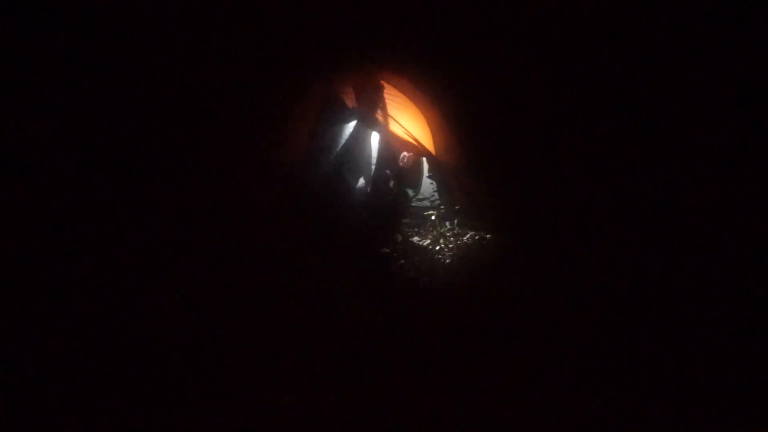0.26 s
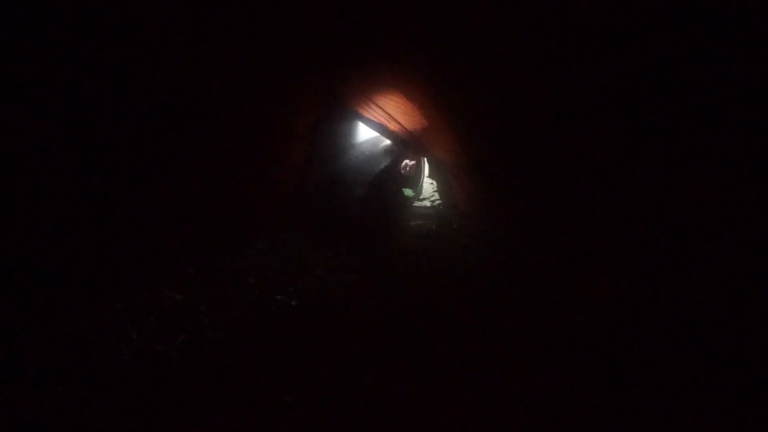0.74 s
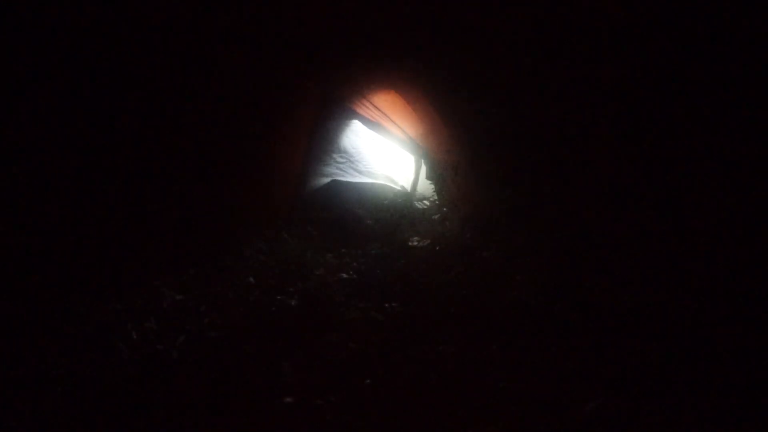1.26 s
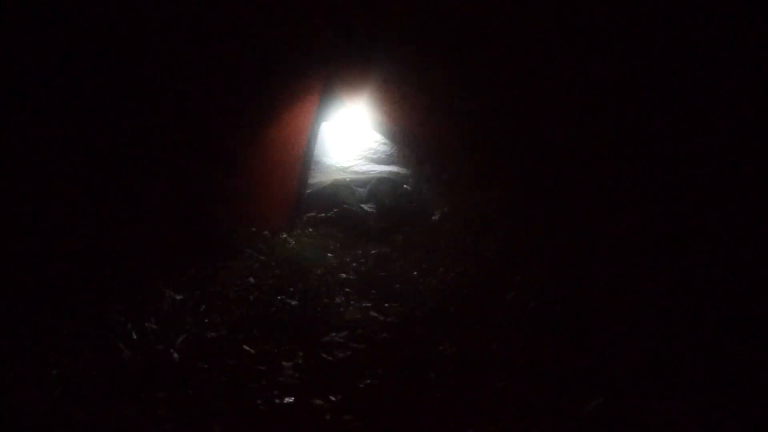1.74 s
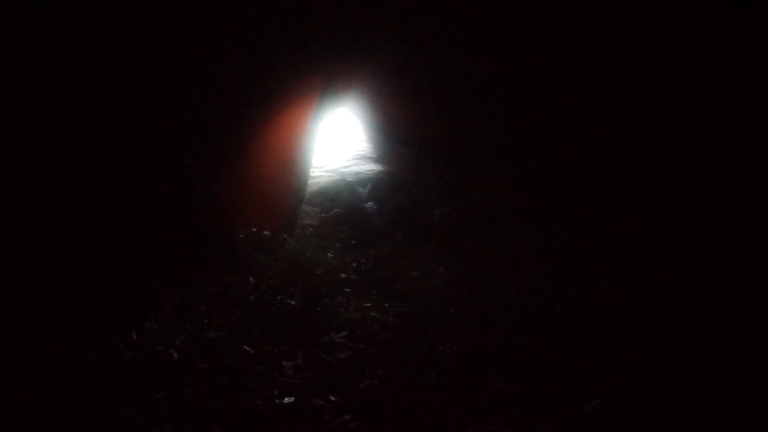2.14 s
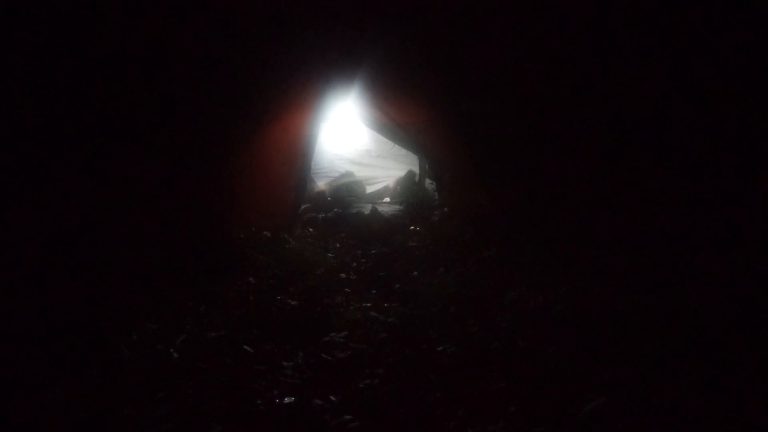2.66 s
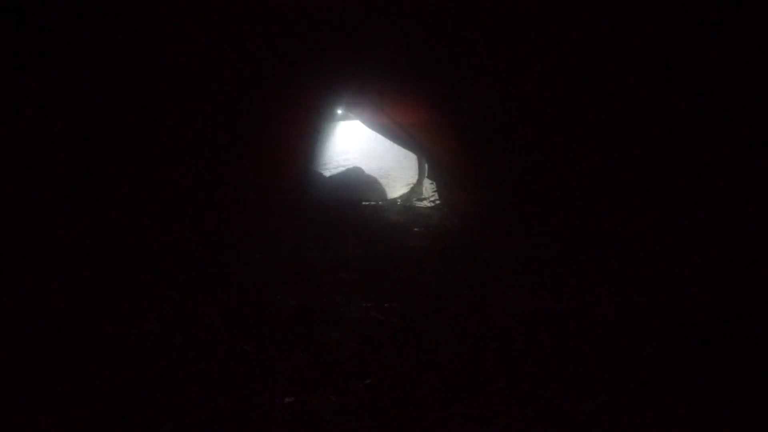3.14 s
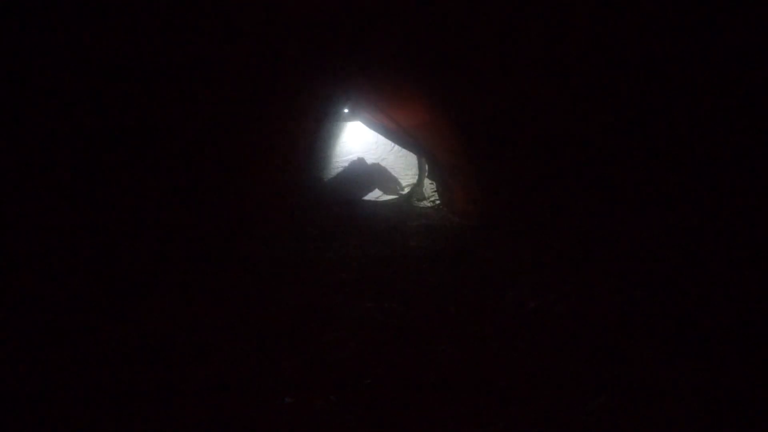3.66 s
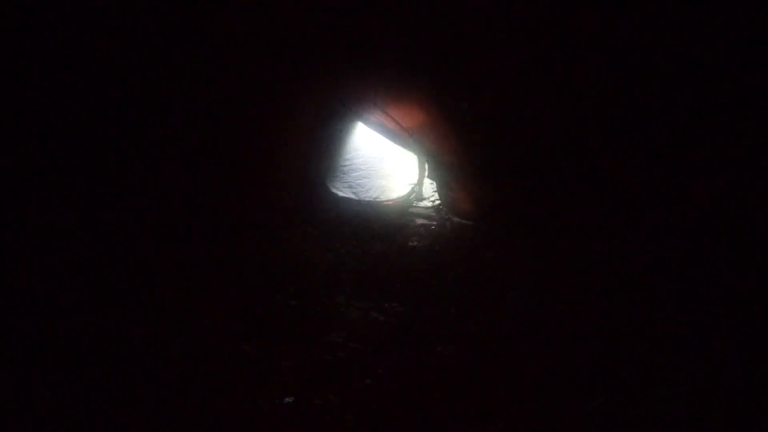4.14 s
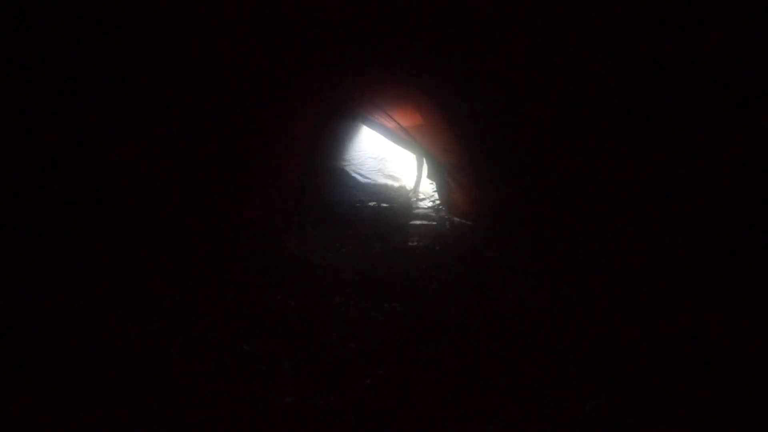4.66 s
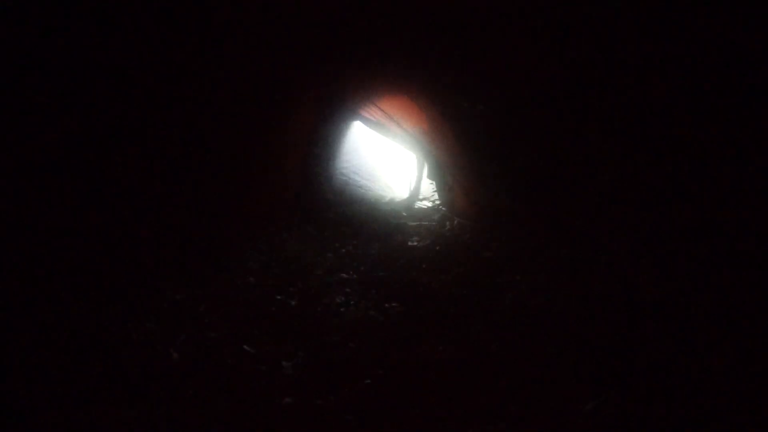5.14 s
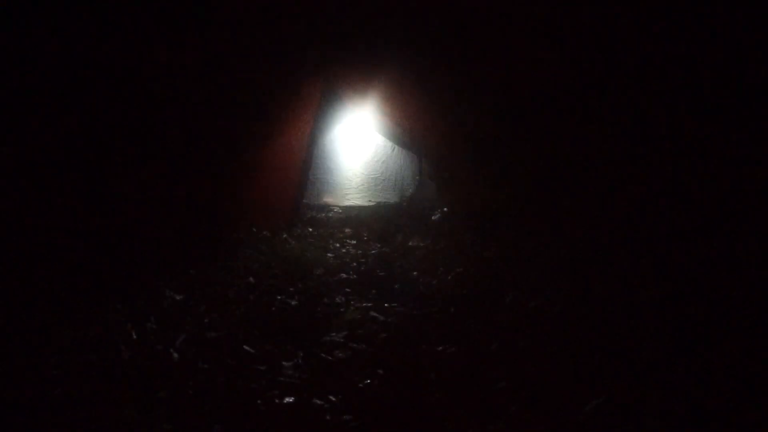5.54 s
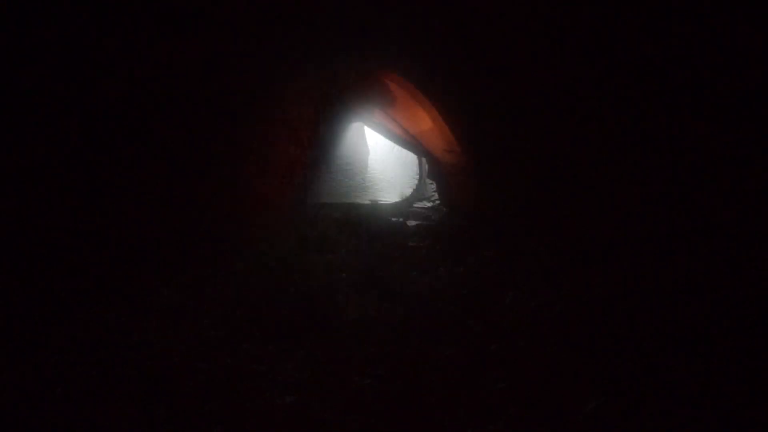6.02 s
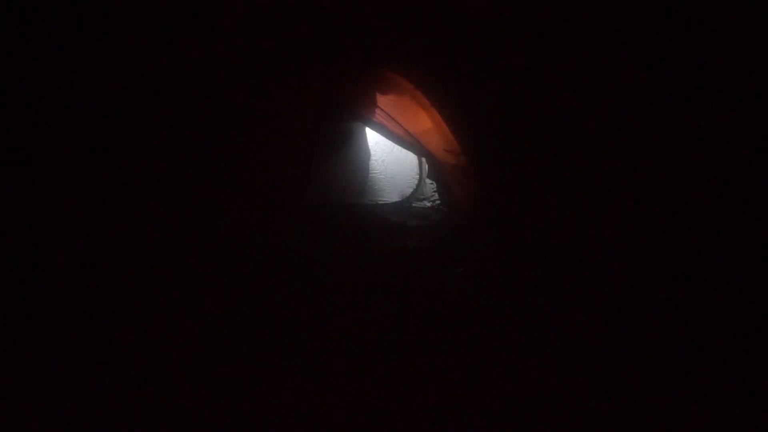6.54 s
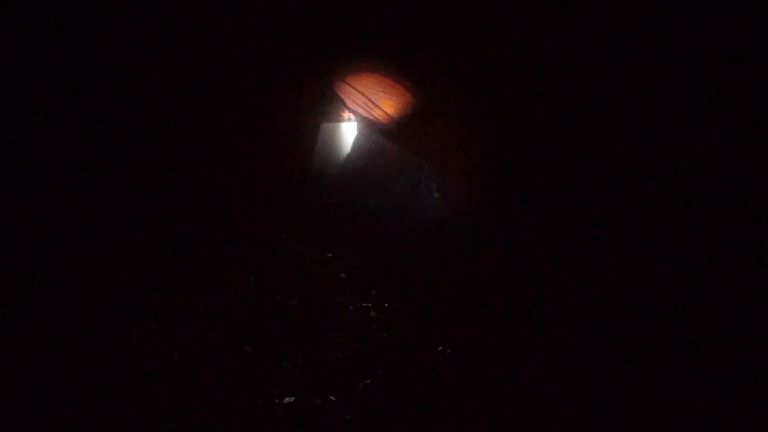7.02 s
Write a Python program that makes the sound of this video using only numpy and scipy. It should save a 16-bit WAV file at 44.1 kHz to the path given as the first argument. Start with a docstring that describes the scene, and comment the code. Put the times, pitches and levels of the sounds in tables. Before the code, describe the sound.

A quiet campsite at night, faint steady hush with a barely audible high whine, tent some metres away and slightly left. Soft nylon swishes open. At 0.6 s a zipper accelerates into a bright singing buzz, snaps near 1.0, and slows to a low uneven rasp until 1.3. Cloth slides gently, with a small snap at 1.75. A short zip rises and falls at 2.45-2.65, breathy on top; a low brief pull with quick knocks follows at 2.8-2.9. Airy nylon swishes swell around 3.1 and 3.4, with a sharp tap at 3.4 and little ticks at 3.8-4.0. After a lull, bright sweeping cloth whistles at 4.7-5.0. The final run starts as a slow growl at 5.1, then becomes a fast, higher buzz from 5.35 to 5.75, with a strong knock and snap near 5.7. Fading rustles and light taps come at 6.2 and 6.7, then hush.

```python
"""Tent zipper at night

A tent door some metres away at a quiet campsite is zipped in four short runs of one or two pulls.
The slider ticks over the teeth, and the taut panel sings at the tooth rate (sine waves) over a noisy rasp.
Shaped noise makes nylon swish and rustle, uneven sines whistle breathily, and short bursts knock.
Under it lie a faint outdoor hush of steady noise and a thin electronic whine."""
import sys
import numpy as np
from scipy import signal
from scipy.fft import rfft, irfft, next_fast_len
from scipy.io import wavfile
from scipy.ndimage import map_coordinates

SR = 44100
rng = np.random.default_rng(int(sys.argv[2]) if len(sys.argv) > 2 else 0)


def master_out(mix):
    """Clip the mix to full scale and print it as 16-bit PCM to the path in sys.argv[1]."""
    frames = np.transpose(np.atleast_2d(mix))
    ceiling = np.clip(frames, -1, 1)
    pcm = np.round(ceiling * 32767).astype(np.int16)
    wavfile.write(sys.argv[1], SR, pcm)


N = 321351
TOP_HZ = 15800  # nothing is kept above this


def amp(db):
    """Decibels to gain."""
    return 10 ** (np.asarray(db) / 20)


def unit(x):
    """Scale a signal to rms 1."""
    return x / np.sqrt(np.mean(x ** 2) + 1e-20)


def along(points, hz):
    """Read (frequency, value) points at any frequency, on a log axis."""
    f, v = np.transpose(points)
    return np.interp(np.log(hz + 1), np.log(f + 1), v)


def curve(rows, axis):
    """One column of a table, joined by straight lines in time."""
    columns = np.transpose(rows)
    return np.interp(np.arange(N) / SR, columns[0], columns[axis])


def wobble(rate):
    """A smooth random curve through `rate` random points a second."""
    points = rng.standard_normal(int(N * rate / SR) + 4)
    return map_coordinates(points, [np.arange(N) * rate / SR])


def filtered(x, response):
    """Multiply the spectrum of x by a response that depends on frequency."""
    m = next_fast_len(N + SR // 4)
    hz = np.fft.rfftfreq(m, 1 / SR)
    return irfft(rfft(x, m) * response(hz), m)[..., :N]


def coloured(pair, spectrum, alike):
    """Turn two unrelated signals into stereo of rms 1 with a given colour and left-right likeness."""
    def mid_side(hz):
        turn = np.arccos(np.clip(along(alike, hz), -1, 1)) / 2
        return amp(along(spectrum, hz)) * [np.cos(turn), np.sin(turn)]

    mid, side = filtered(pair, mid_side)
    return unit(np.array([mid + side, mid - side]))


def during(rows):
    """Gain 1 over the time span of a table, fading in and out just outside it."""
    fade_s = 0.014
    t = np.arange(N) / SR
    inside_s = np.minimum(t - rows[0][0], rows[-1][0] - t)
    return np.clip(1 + inside_s / fade_s, 0, 1)


def swell(peak_s, rise_s, fall_s):
    """One swell of sound: the gain grows to 1 at its peak and sinks again."""
    loss_db, roundness = 10, 1.32  # dB lost after one rise or fall time; shape of the top
    gain = np.zeros(N)
    start = max(0, int((peak_s - 4 * rise_s) * SR))
    stop = min(N, int((peak_s + 4 * fall_s) * SR))
    near = np.arange(start, stop)
    t = near / SR - peak_s
    gain[near] = amp(-loss_db * np.maximum(-t / rise_s, t / fall_s) ** roundness)
    return gain


def movements(rows, axis):
    """Overlapping movements add up in power; one column holds their peak levels."""
    return np.sqrt(sum((amp(row[axis]) * swell(*row[:3])) ** 2 for row in rows))


# Colour of the night hush: (frequency [Hz], relative level per Hz [dB])
HUSH_COLOUR = [(15, -63), (25, -37), (187, -18.5), (258, -11.5), (329, -10.5), (387, -5.5), (717, -5),
               (1130, -9), (2270, -7.5), (3400, -12), (7610, -16), (9440, -16), (10800, -15.5),
               (14100, -17), (15300, -8.5)]
# How alike left and right are in the hush: (frequency [Hz], coherence [-1 to 1])
HUSH_LIKENESS = [(60, 0.015), (150, 0.25), (380, -0.24), (950, -0.3), (2380, -0.2), (5980, 0.15),
                 (15000, 0.39)]


def night():
    """Steady wide noise, plus a band of noise near 1.2 kHz that sounds soft and hollow."""
    hush = coloured(rng.standard_normal((2, N)), HUSH_COLOUR, HUSH_LIKENESS)
    hush_gain = amp(-55 + 0.3 * wobble(11))
    hollow_colour = [(600, -42), (950, -9.5), (1150, -8.0), (1350, -7.5), (1700, -53)]
    hollow = coloured(rng.standard_normal((2, N)), hollow_colour, HUSH_LIKENESS)
    return hush_gain * hush + amp(-62.0) * hollow


# How long ground and trees scatter sound: (frequency [Hz], time to fall by 60 dB [s])
SCATTER_TIMES = [(200, 0.22), (1200, 0.71), (4000, 0.3), (14000, 0.096)]


def clearing(x):
    """Ground and trees scatter a thin, short answer: dying noise, different in each ear."""
    hz, t, z = signal.stft(rng.standard_normal((2, SR // 3)), SR, nperseg=256)
    decay = amp(-60 * t / along(SCATTER_TIMES, hz)[:, None])
    tail = signal.istft(z * decay, SR, nperseg=256)[1]
    tail = tail / np.linalg.norm(tail[0])
    return signal.fftconvolve(x.mean(0)[None], tail, axes=1)[:, :N]


# How alike left and right are in tent sounds: (frequency [Hz], coherence [-1 to 1])
TENT_LIKENESS = [(200, 0.9), (1100, 0.36), (2400, 0.43), (5000, 0.72), (12000, 0.86)]


def rubbing(spectrum, grain_db, flutter_db):
    """Cloth friction is many tiny slips in clumps: noise with a random level, fast and slow."""
    level_db = grain_db * wobble(1400) + flutter_db * wobble(60)
    slips = rng.standard_normal((2, N)) * amp(level_db)
    return coloured(slips, spectrum, TENT_LIKENESS)


# Nylon sliding on nylon:
# (peak time [s], rise time [s], fall time [s], swish level [dB], sheen level [dB])
NYLON_SLIDES = [(0.02, .1, .1, -62.5, -61), (0.156, 0.19, 0.18, -57.5, -58.5),
                (0.335, 0.16, 0.12, -54, -52.5), (0.55, .2, 0.22, -60.5, -63.5),
                (1.34, 0.16, 0.48, -58, -57.5), (1.67, 0.068, 0.21, -59.5, -58.5),
                (1.9, 0.18, 0.11, -56, -56.5), (2.05, 0.099, .15, -62.5, -60),
                (2.67, 0.081, .15, -60, -58.5), (2.92, 0.15, 0.24, -53, -59),
                (3.09, 0.19, 0.23, -50.5, -45), (3.4, 0.11, 0.24, -53, -50),
                (3.72, 0.17, 0.4, -61.5, -62.5), (3.96, 0.073, 0.1, -57, -63.5),
                (4.6, 0.085, 0.086, -60.5, -63), (4.71, 0.034, .08, -53, -51.5),
                (4.785, 0.068, 0.17, -52, -44.5), (4.93, .09, 0.11, -55.5, -45),
                (5.0, .06, 0.067, -49.5, -46), (5.11, 0.073, 0.12, -59.5, -56), (5.79, .05, 0.15, -58, -58),
                (6.27, .025, 0.096, -59, -62), (6.345, .06, 0.27, -59.5, -58), (6.67, 0.022, .05, -61, -58),
                (6.715, 0.053, 0.12, -57.5, -53.5)]
# The floor and bedding shifting: (peak time [s], rise time [s], fall time [s], rustle level [dB])
FLOOR_SHIFTS = [(2.56, 0.0093, 0.044, -49), (2.835, 0.067, 0.033, -48.5), (2.885, 0.021, 0.044, -51),
                (3.08, 0.36, .13, -60.5), (3.385, .03, 0.16, -59), (3.8, 0.32, 0.2, -62),
                (4.74, 0.078, 0.071, -60.5), (5.35, .015, .015, -47.5), (5.475, .025, .05, -59),
                (6.185, .01, 0.061, -57), (6.28, .04, .05, -55), (6.41, 0.17, 0.15, -59),
                (6.665, 0.033, .1, -64)]
# Colour of the swish: (frequency [Hz], relative level per Hz [dB])
SWISH_COLOUR = [(300, -17), (700, -6.5), (1150, 2), (1650, -4.5), (2300, 1), (3200, -4.5), (5000, -0.5),
                (6300, -9), (9000, -22)]
# Colour of the sheen, the bright top of the swish: (frequency [Hz], relative level per Hz [dB])
SHEEN_COLOUR = [(3000, -46), (5500, -6), (7300, -1.5), (10000, -1), (12800, 0), (15500, -5)]
# Colour of the low rustle: (frequency [Hz], relative level per Hz [dB])
RUSTLE_COLOUR = [(40, -19), (110, -19), (200, -4.5), (350, 3), (600, 1.5), (1000, -7), (2000, -24.5)]


def nylon():
    """The door slides over itself while floor and bedding shift: swells of friction noise."""
    swish = movements(NYLON_SLIDES, axis=3) * rubbing(SWISH_COLOUR, grain_db=2.0, flutter_db=1.47)
    sheen = movements(NYLON_SLIDES, axis=4) * rubbing(SHEEN_COLOUR, grain_db=1.0, flutter_db=1.2)
    rustle = movements(FLOOR_SHIFTS, axis=3) * rubbing(RUSTLE_COLOUR, grain_db=1.0, flutter_db=3.5)
    return swish + sheen + rustle


# Short breathy whistles: some are brush-like strokes, those at 2.55, 2.57 and 5.435 s are
# bright upper tones of the zip: (peak time [s], rise time [s], fall time [s], level [dB],
# pitch at the peak [Hz], glide [Hz per s], unevenness [share of the pitch])
SHORT_WHISTLES = [(2.55, .015, .02, -43, 2153, 0, .08), (2.57, 0.066, .04, -46, 2348, -1500, .19),
                  (3.09, 0.07, .12, -50, 4960, -3000, .12), (3.41, .05, .05, -55.5, 2080, 0.5, .08),
                  (4.72, 0.022, .04, -56, 2800, 0, .11), (4.995, 0.044, .025, -49.5, 2365, 2001, .08),
                  (4.99, .05, 0.031, -49, 4890, 0, .1), (5.435, 0.019, 0.064, -48.5, 5300, -11000, 0.098),
                  (6.303, .017, .017, -51.5, 2140, 5998, 0.1)]
# One long sweep of the door across the weave: (time [s], thread rate [Hz], level [dB])
DOOR_SWEEP = [(4.75, 4170, -56), (4.79, 8500, -48), (4.82, 9500, -48.5), (4.86, 7500, -55),
              (4.92, 8050, -50), (4.995, 6430, -50), (5.04, 12500, -54), (5.07, 12000, -55)]


def whistles():
    """Breathy whistles, a long sweep and short swells: sines with an uneven pitch and level."""
    t, waver = np.arange(N) / SR, wobble(1600)
    flicker = unit(amp(2.6 * wobble(900)))

    def whistle(hz, uneven):
        cycles = np.cumsum(hz * (1 + uneven * waver)) / SR
        return np.sqrt(2) * np.sin(2 * np.pi * cycles)

    sweep_gain = during(DOOR_SWEEP) * amp(curve(DOOR_SWEEP, axis=2))
    total = sweep_gain * whistle(curve(DOOR_SWEEP, axis=1), uneven=0.0755)
    for s, rise, fall, db, hz, glide, uneven in SHORT_WHISTLES:
        total += amp(db) * swell(s, rise, fall) * whistle(hz + glide * (t - s), uneven)
    return flicker * total


# Knocks of the pull tab and tent gear, levels before small trims:
# (time [s], ring level [dB], ring pitch [Hz], low thud level [dB])
GEAR_KNOCKS = [(2.827, -39, 450, -53), (2.863, -43, 450, -52), (2.8773, -34, 448, -50),
               (3.382, -31.5, 2205, -53), (3.792, -41.5, 910, -61), (3.913, -46.5, 2380, -54),
               (3.94, -55, 2000, -58), (3.98, -48, 2197, -55), (5.685, -27, 474.5, -60),
               (6.178, -35, 1230, -49), (6.666, -45.5, 3070, -62)]
# Sharp snaps of the slider and cloth: (time [s], level before a 5.5 dB cut [dB])
CLOTH_SNAPS = [(1.0144, -38), (1.7522, -42), (2.938, -34.5), (5.6828, -25.5)]
# What a knock rings with: (multiple of its ring pitch, level [dB], time to fall by 60 dB [s])
RING_MODES = [(.7, -15.5, .018), (1, 2, 0.0097), (1.35, -3, 0.012), (2.3, -7.5, .008)]


def taps():
    """Knocks are dying sines with a crack and a thud of noise; snaps are a bright crack only."""
    out, t = np.zeros(N + SR), np.arange(SR // 8) / SR

    def burst(lo_hz, hi_hz):
        band = signal.butter(2, [lo_hz, min(hi_hz, TOP_HZ)], "band", fs=SR, output="sos")
        return unit(signal.sosfilt(band, rng.standard_normal(len(t))))

    for s, db, hz, thud_db in GEAR_KNOCKS:
        ring = np.zeros(len(t))
        for ratio, mode_db, t60 in RING_MODES:
            chance_db = rng.normal(0, 0.88)
            ring += amp(mode_db + chance_db - 60 * t / t60) * np.sin(2 * np.pi * hz * ratio * t)
        ring *= 1 - np.exp(-1.3 * hz * t)  # the cloth takes about a cycle to give
        crack = 0.5 * amp(-60 * t / 0.0077) * burst(hz * 0.66, hz * 3)
        thud = amp(thud_db + 1.5 - 60 * t / 0.05) * burst(lo_hz=209, hi_hz=680)
        out[round(s * SR):][:len(t)] += amp(db + 1.0) * (ring + crack) + thud
    for s, db in CLOTH_SNAPS:
        snap = amp(db - 5.5 - 60 * t / 0.016) * burst(lo_hz=4950, hi_hz=15140)
        out[round(s * SR):][:len(t)] += snap
    return out[:N]


# Each pull of the slider: (lift of the second partial [dB], loudest rasp level [dB], its course),
# the course in rows of (time [s], teeth per second [Hz], panel tone level [dB], sizzle level [dB])
ZIPPER_PULLS = [ (-7.5, -46.5, [(0.595, 380, -63, -66), (0.623, 430, -61, -63), (0.635, 759.8, -48, -62),
                (0.651, 784.2, -41.5, -61), (0.672, 809, -57.5, -58.5), (0.75, 1172, -46, -49.5),
                (0.818, 1183, -45, -49.5), (0.831, 1140, -35, -49), (0.895, 1112, -34.5, -49.5),
                (0.965, 1160, -40.5, -44), (1.012, 1167, -37, -36), (1.04, 949, -47, -45),
                (1.063, 481, -52, -46)]), (-11, -46.5, [(1.078, 230, -50, -41.5), (1.105, 250, -51.5, -50),
                (1.138, 480, -40.5, -47), (1.178, 290, -49.5, -52), (1.24, 285, -48, -57.5),
                (1.28, 330, -40.5, -54.5), (1.32, 175.6, -48.5, -62), (1.332, 150.2, -70, -68)]),
                (-3.5, -46.5, [(2.435, 260.5, -59.5, -81), (2.46, 459.3, -47, -63),
                (2.5, 719.5, -46.5, -51), (2.53, 811, -43, -53), (2.555, 700.4, -63, -43.5),
                (2.582, 900, -54, -44), (2.612, 428, -46.5, -54.5), (2.63, 379, -62, -61),
                (2.66, 331, -63, -66)]), (-4, -65, [(2.775, 279.6, -65, -63), (2.815, 311.4, -53, -72),
                (2.833, 318.4, -43, -70), (2.852, 305.5, -42, -62), (2.87, 200, -52, -58),
                (2.9, 250, -59, -53)]), (-10, -50.5, [(5.1, 229.7, -62, -61), (5.16, 350.4, -52.5, -60.5),
                (5.175, 470, -49, -54), (5.205, 380, -52, -58), (5.24, 470, -44.5, -52),
                (5.265, 480, -57, -49.5), (5.292, 490.3, -37, -50.5), (5.322, 439.5, -48, -51)]),
                (14.5, -45, [(5.338, 899, -49, -44), (5.358, 978, -41.5, -42.5),
                (5.39, 829.7, -45.5, -43.5), (5.425, 760, -37.5, -47.5), (5.49, 713, -39, -50),
                (5.545, 770, -41, -47), (5.565, 807, -56, -47.5), (5.612, 847, -39.5, -42.5),
                (5.645, 930.5, -51, -43), (5.705, 770, -46.5, -37), (5.756, 319.2, -42.5, -49.5),
                (5.785, 219.7, -64, -66)])]
# How readily the panel radiates a partial: (frequency [Hz], level [dB])
PANEL_RESPONSE = [(160, -21.5), (320, 0.5), (480, 1.5), (620, -8), (830, 1), (960, -1.5), (1140, -2),
                  (1480, -4.5), (1650, -10.5), (1950, -18.5), (2120, 3), (2300, 3.5)]


def pulling():
    """Tooth rate, and the gains of the first partial, second partial, rasp and sizzle."""
    rasp_follows = 0.46  # dB of rasp for each dB of sizzle
    rows = []
    for octave_db, loudest_db, course in ZIPPER_PULLS:
        hardest_db = max(row[-1] for row in course)
        for s, hz, tone_db, sizzle_db in course:
            rasp_db = loudest_db + rasp_follows * (sizzle_db - hardest_db)
            rows.append((s, hz, tone_db, sizzle_db, octave_db, rasp_db))
    speed, tone_db, sizzle_db, octave_db, rasp_db = [curve(rows, axis=k) for k in range(1, 6)]
    moving = np.max([during(course) for _, _, course in ZIPPER_PULLS], axis=0)
    # besides the lift, the panel favours whichever partial it radiates better
    octave = amp(octave_db + along(PANEL_RESPONSE, 2 * speed) - along(PANEL_RESPONSE, speed))
    first = moving * amp(tone_db) / np.hypot(1, octave)
    return speed, first, first * octave, moving * amp(rasp_db), moving * amp(sizzle_db)


def tooth_clicks(travel, scatter, size_db):
    """One click as each tooth passes, a little uneven in place and size."""
    teeth = np.arange(1, int(travel[-1]))
    chance = rng.standard_normal((len(teeth), 2))
    at = np.interp(teeth + scatter * chance[:, 0], travel, np.arange(N))
    # a sinc pulse places each click between samples
    nearby = np.clip(at.astype(int)[:, None] + np.arange(-7, 9), 0, N - 1)
    clicks = amp(size_db * chance[:, 1:]) * np.sinc(nearby - at[:, None])
    return np.bincount(nearby.ravel(), clicks.ravel(), N)


# How the slider and door pass the upper partials: (frequency [Hz], level [dB])
SLIDER_RESPONSE = [(500, -3), (1400, 1), (2350, 3), (2750, -5.5), (3500, -3), (4350, 4), (5200, -3.5),
                   (7000, -18)]


def tooth_overtones(phase, drift):
    """Third to sixth partials of the ticking, odd ones stronger; each flickers as the cloth flexes."""
    partials = np.zeros(N)
    for k in range(3, 7):
        gain = amp(4.1 * (k % 2) + 5.9 * wobble(70))
        partials += gain * np.sin(k * phase + drift * wobble(300))
    return filtered(unit(partials), lambda hz: amp(along(SLIDER_RESPONSE, hz)))


# The taut door as a drumhead: (resonance [Hz], width [Hz], level [dB])
DOOR_RESONANCES = [(331, 95, 0), (505, 130, 2.5), (850, 200, -5.5), (1124, 560, -9.5)]


def drumhead(scrape, speed):
    """Scraping excites the door's resonances; each fades when the teeth outrun its pitch."""
    outrun = 1.41  # tooth rate over resonance pitch at which it is halved
    hz, width, db = np.transpose(DOOR_RESONANCES)[:, :, None]

    def resonance(f):
        damping = 1j * f * width
        return amp(db) * (damping / (hz * hz - f * f + damping)) ** 2

    rings = filtered(scrape, resonance)
    heard = rings / (1 + (speed / (outrun * hz)) ** 6)
    return np.sum(heard, axis=0) / rings.sum(0).std()


# Colour of the rasp of the teeth: (frequency [Hz], relative level per Hz [dB])
RASP_COLOUR = [(100, -13), (280, -2), (500, 7), (800, 4.5), (1300, -1), (1700, -0.5), (2200, 7.5),
               (3100, -1), (4400, 2), (6200, -5.5), (9000, -11)]
# Colour of the sizzle, the high part of the scraping: (frequency [Hz], relative level per Hz [dB])
SIZZLE_COLOUR = [(2500, -27), (5000, -5.5), (7000, -4), (9000, -1.5), (11300, 2), (11700, 4.5), (12100, 0),
                 (13500, 4), (15500, -4.5)]


def zipper():
    """The slider's speed sets the pitch of the panel and the rhythm of the rasp."""
    speed, first_gain, second_gain, rasp_gain, sizzle_gain = pulling()
    # a slow slider sticks and slips, a fast one runs more evenly
    stick_slip = 36 / (1 + speed / 1000) * wobble(240)
    rate = speed * (1 + .008 * wobble(110)) + stick_slip
    travel = np.cumsum(np.abs(rate)) / SR  # teeth passed so far
    phase = 2 * np.pi * travel
    # the cloth panel follows the teeth; the grip on them changes all the time
    first = first_gain * amp(0.77 + 2.5 * wobble(130)) * np.sin(phase)
    second = second_gain * amp(-3.0 + 3.9 * wobble(150)) * np.sin(2 * phase + 0.4 * wobble(300))
    # a hard pull brings out the upper partials along with the sizzle
    bite = rasp_gain * amp(-7.0) + sizzle_gain * amp(-12.5) * speed / 900
    overtones = bite * tooth_overtones(phase, drift=0.54)
    panel = np.sqrt(2) * (first + second) + overtones
    # each tooth clicks, then scrapes through the slider
    clicks = np.array([tooth_clicks(travel, scatter=0.0495, size_db=2.0) for _ in range(2)])
    clicks *= np.sqrt(SR / speed)  # evens out the power at slow and fast rates
    scrape = unit(np.exp(-1.0 * (travel % 1))) * rng.standard_normal((2, N))
    teeth = (0.5 * clicks + scrape) * amp(1.05 * wobble(110))
    # the rasp loses its bass as the tooth rate passes the skimming rate
    bass_hz, skim_hz = 634, 950
    rasp = coloured(teeth, RASP_COLOUR, TENT_LIKENESS)
    bass = filtered(rasp, lambda hz: 1 / (1 + (hz / bass_hz) ** 8))
    rasp = rasp_gain * (rasp - bass / (1 + (skim_hz / speed) ** 10))
    sizzle = sizzle_gain * coloured(teeth, SIZZLE_COLOUR, TENT_LIKENESS)
    # uneven scraping also drums on the door at its own resonances
    drum = np.hypot(first_gain, second_gain) * amp(-12) * drumhead(scrape[0], speed)
    return panel + rasp + sizzle + drum


def scene():
    """The tent stands to the left, most clearly in the treble; thin cloth radiates little bass."""
    left_db = [(200, 0.55), (2000, 0.61), (8000, 1.4)]  # raises left and lowers right
    bass_db = [(30, -7), (100, -5), (200, 0)]

    def placed(hz):
        return amp(along(left_db, hz) * np.array([[1], [-1]]) + along(bass_db, hz))

    tent = filtered(nylon() + whistles() + taps() + zipper(), placed)
    return night() * amp([[.9], [-.9]]) + amp(-12) * clearing(tent) + tent


def record(dry):
    """Add a thin electronic whine, a steady high sine, and keep nothing above the band limit."""
    whine = amp(-63) * np.sqrt(2) * np.sin(2 * np.pi * 15625 * np.arange(N) / SR)
    return filtered(dry + whine, lambda hz: hz < TOP_HZ)


dry = scene()
out = record(dry)
master_out(out)
```